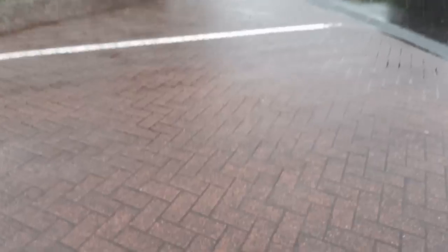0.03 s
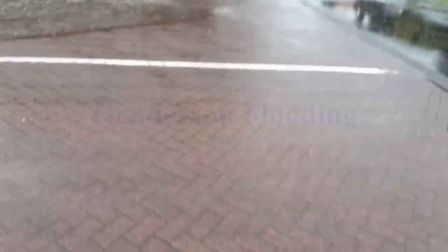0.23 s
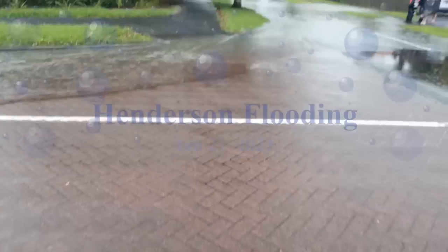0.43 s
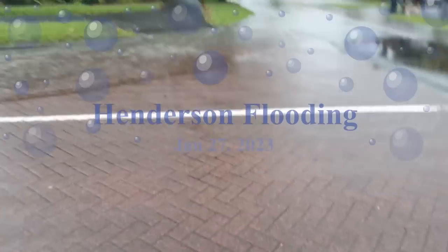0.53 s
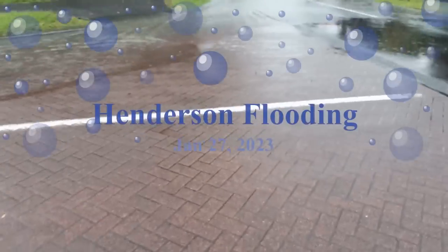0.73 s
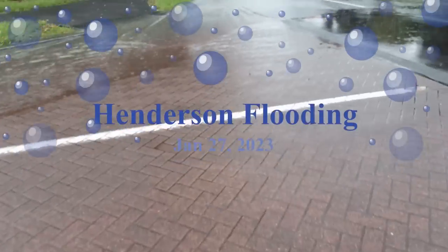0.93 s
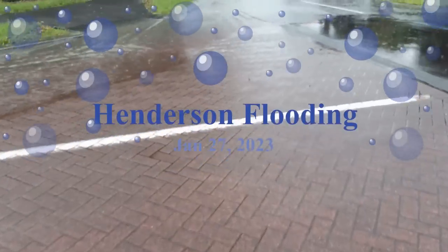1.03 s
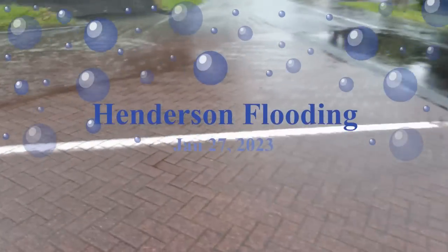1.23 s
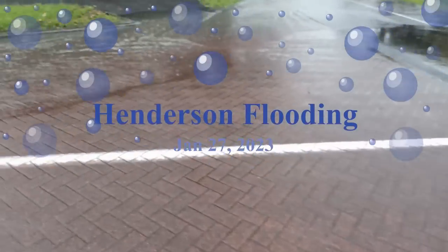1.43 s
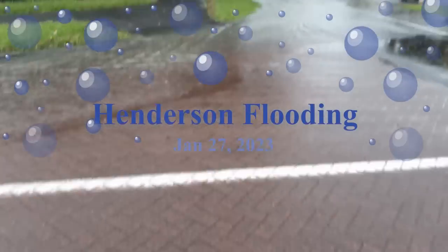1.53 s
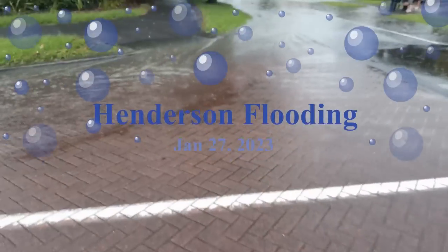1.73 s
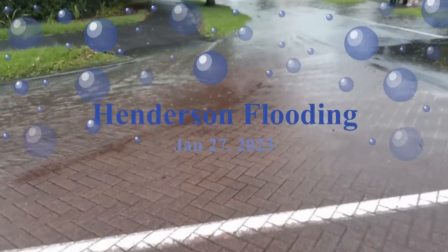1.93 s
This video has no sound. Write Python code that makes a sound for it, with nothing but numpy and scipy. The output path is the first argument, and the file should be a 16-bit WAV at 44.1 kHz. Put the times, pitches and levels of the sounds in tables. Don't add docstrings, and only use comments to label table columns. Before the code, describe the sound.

Constant rain hiss with fine patter and low flowing water, faint distant hum and brief tyre swish; sparse big drops snap close to a small handheld stereo microphone, louder and more ringing on the right.

```python
import sys
import numpy as np
from scipy import signal
from scipy.io import wavfile
from scipy.ndimage import uniform_filter1d

SR = 44100
rng = np.random.default_rng(int(sys.argv[2]) if len(sys.argv) > 2 else 0)


def master_out(mix):
    frames = np.transpose(np.atleast_2d(mix))
    ceiling = np.clip(frames, -1, 1)
    pcm = np.round(ceiling * 32767).astype(np.int16)
    wavfile.write(sys.argv[1], SR, pcm)


def ratio_of_db(decibels):
    return 10 ** (np.asarray(decibels, float) / 20)


N = 88200

# pitch_hz [Hz], level_db [dB per Hz]
HISS = [(400, 5.5), (800, 0), (1450, -11.5), (2000, -3.5), (3500, -13), (7000, -17.5), (8300, -16),
        (16000, -18.5)]
FAR_TOP_HZ, CUTOFF_HZ = 15750, 16750


def rms_one(x):
    return x / np.sqrt(np.mean(x ** 2) + 1e-20)


def line(points, at, warp=lambda v: v):
    a, b = np.transpose(points)
    return np.interp(warp(at), warp(a), b)


def drift(rate):
    r = np.exp(-80 * np.pi * rate / SR)
    steps = rng.standard_normal(N // 40 + 2002)
    slow = signal.lfilter([1], [1, -2 * r, r * r], steps)[2000:]
    return np.interp(np.arange(N) / 40, np.arange(len(slow)), rms_one(slow))


def band(x, low_hz, high_hz):
    edges = [low_hz, min(high_hz, .45 * SR)]
    return signal.sosfilt(signal.butter(2, edges, "band", fs=SR, output="sos"), x)


def top_cut(x, hz):
    return signal.sosfilt(signal.ellip(12, .3, 70, hz, fs=SR, output="sos"), x)


def ring(clicks, hz, t60):
    r, w = ratio_of_db(-60 / (t60 * SR)), 2 * np.pi * hz / SR
    return signal.lfilter([0, np.sin(w)], [1, -2 * r * np.cos(w), r * r], clicks + 1e-18)


def bells(x, rows):
    for hz, width_hz, db in rows:
        g, w = ratio_of_db(db / 2), 2 * np.pi * hz / SR
        q = np.sin(w) * width_hz / hz / 2
        top = [1 + q * g, -2 * np.cos(w), 1 - q * g]
        bottom = [1 + q / g, -2 * np.cos(w), 1 - q / g]
        x = signal.lfilter(top, bottom, x)
    return x


def water_noise(spectrum, edges, slow_db, fast_db):
    # pitch_hz [Hz], share [0-1]
    likeness = [(60, .9), (380, 0.9), (700, 0.49), (1300, 0), (15000, 0.37)]
    out, together, white = 0, drift(7.6), rng.standard_normal((2, 2, N))
    for k, (low, high) in enumerate(zip(edges, edges[1:])):
        mid, side = band(white[k % 2], low, high)
        hz = np.sqrt(low * high)
        alike = np.clip(line(likeness, hz, np.log), 0, 1)
        flicker_db = slow_db * together + fast_db * drift(6.9)
        gain = ratio_of_db(line(spectrum, hz, np.log) + flicker_db)
        out = out + gain * (np.sqrt(1 + alike) * mid + np.sqrt(1 - alike) * side * [[1], [-1]])
    return rms_one(out)


def running_water():
    # time_s [s], level_db [dB]
    flow = [(.11, -40), (.25, -43), (.4, -39), (.5, -41.5), (.66, -40.5), (.77, -38), (.97, -38.5),
            (1.12, -37.5), (1.4, -41), (1.6, -43), (1.8, -40.5), (2.0, -42)]
    # pitch_hz [Hz], level_db [dB per Hz]
    roar = [(36, -32), (50, -10), (68, -6), (100, -2), (230, 1), (330, 0.5), (400, -9), (1100, -17)]
    level_db = line(flow, np.arange(N) / SR) - 1
    edges_hz = 28 * 2 ** np.arange(0, 5.7, 1 / 3)
    return ratio_of_db(level_db) * water_noise(roar, edges_hz, slow_db=-0.23, fast_db=0.73)


def patter():
    drops_per_s, drop_cycles, spread_db = 1500, 3.0, 2.6
    sizes = ratio_of_db(spread_db * np.minimum(rng.exponential(1, N), 3.5)) * rng.choice([-1, 1], N)
    clicks = sizes * (rng.random(N) < drops_per_s / SR) * rng.standard_normal((2, N))
    dealt = rng.integers(0, 16, N)
    out = 0
    for k, hz in enumerate(np.geomspace(1200, 15000, 16)):
        gain = ratio_of_db(line(HISS, hz, np.log)) * hz / 1000
        out = out + gain * ring(clicks * (dealt == k), hz, drop_cycles / hz)
    return rms_one(out)


def rain():
    # time_s [s], level_db [dB]
    shower = [(.11, -45), (.25, -44), (.42, -45.5), (.55, -42), (.7, -45), (.85, -45.5), (.98, -43.5),
              (1.12, -43), (1.3, -45.5), (1.55, -44.5), (1.7, -44), (2.0, -45.5)]
    level_db = line(shower, np.arange(N) / SR) - 3
    far = water_noise(HISS, 400 * 2 ** np.arange(0, 5.8, 1 / 3), slow_db=-0.48, fast_db=1.95)
    return ratio_of_db(level_db) * (far + ratio_of_db(-15) * patter())


def hum():
    # pitch_hz [Hz], level_db [dB]
    tones = [
        (50.5, -51),
        (102.4, -51.5),
        (226, -53.5),
    ]
    width_hz = 6.7
    noise = rng.standard_normal((3, 2 * N))
    noise = noise[0] + 0.83 * noise[1:]
    out = 0
    for hz, db in tones:
        out = out + ratio_of_db(db) * rms_one(ring(noise, hz, 1.7 / width_hz)[:, N:])
    return out


def tyres():
    # time_s [s], level_db [dB]
    passing = [(.11, -52), (.3, -52), (.45, -61), (.7, -57), (.95, -49), (1.15, -55.5), (1.4, -66),
               (2.0, -82)]
    low_hz, high_hz = 903, 1634
    swish = band(band(rng.standard_normal((2, N)), low_hz, high_hz), low_hz, high_hz)
    return ratio_of_db(line(passing, np.arange(N) / SR) + 1.7 * drift(27)) * rms_one(swish)


def spray():
    # centre_s [s], width_s [s], level_db [dB]
    clouds = [
        (1.09, 0.033, -52),
        (0.25, 0.021, -75),
    ]
    t = np.arange(N) / SR
    level = sum(ratio_of_db(db) * np.exp(-.5 * ((t - s) / width) ** 2) for s, width, db in clouds)
    return level * ratio_of_db(3.0 * drift(60)) * rms_one(band(rng.standard_normal((2, N)), 9000, 15000))


def bursts():
    # start_s [s], peak_db [dB], lowest_hz [Hz], highest_hz [Hz], length_ms [ms]
    big_drops = [(.2672, -33, 700, 13800, 1.3), (0.5394, -29, 4800, 16400, 4.9),
                 (.5614, -26, 1670, 16400, 4.9), (0.5663, -23, 1700, 16400, 2.7),
                 (0.596, -28.5, 1900, 3700, 2), (.5988, -32, 2330, 4000, 4.4),
                 (0.68, -29.5, 8900, 16400, 2.2), (0.6871, -48, 4600, 6500, 2.2),
                 (1.0990, -46, 10000, 14000, 4), (1.104, -45, 3530, 7500, 5.1),
                 (1.133, -43, 3500, 9000, 3.3), (1.1438, -41, 8500, 13500, 1.8),
                 (1.1605, -26.5, 4000, 14000, 1.8), (1.1627, -29.5, 3900, 6050, 6.3),
                 (1.1640, -29, 2350, 13500, 3.6), (1.4950, -45, 8000, 14200, 2.2),
                 (1.5780, -44, 3900, 4960, 3.8), (1.5930, -41.5, 2220, 2920, 15),
                 (1.6055, -36, 8000, 14200, 2.2), (1.6280, -32.5, 5000, 14300, 2.6),
                 (1.6120, -42, 2200, 2900, 25), (1.6500, -42.5, 2200, 2900, 22),
                 (1.687, -39, 10500, 14500, 1.8), (1.9079, -37, 3170, 4500, 1.9)]
    # pitch_hz [Hz],
    # width_hz [Hz], boost_db [dB]
    puddle = [(2600, 600, 4), (3300, 500, -3), (4270, 250, 3), (4600, 250, 5), (5350, 350, 5),
              (6300, 900, -3), (8500, 4000, -5), (12500, 4000, -2), (16800, 900, -26)]
    rise, crackle_db, alike, right_db = 0.21, 3, 0.44, -0.5
    out, size, lag = np.zeros((2, N + SR)), 1400, int(.00048 * SR)
    for s, db, low_hz, high_hz, ms in big_drops:
        noise = rng.standard_normal((4, size))
        u = np.arange(size) / SR * 1000 / ms
        shape = np.minimum(u / rise, 1) * np.exp(-2 * u ** 2)
        crackle = ratio_of_db(crackle_db * uniform_filter1d(noise[3], size=16) * 4)
        puff = np.sqrt(alike) * noise[0] + np.sqrt(1 - alike) * noise[1:3]
        puff = puff * crackle * shape
        puff = band(band(puff, low_hz, high_hz), low_hz * .9, high_hz * 1.1)
        limit_hz = CUTOFF_HZ if high_hz > 15300 else FAR_TOP_HZ
        puff = top_cut(bells(puff, puddle), min(1.35 * high_hz, limit_hz))
        puff = ratio_of_db(db) * puff / np.abs(puff).max(axis=1, keepdims=True)
        i = int(s * SR)
        out[0, i:i + size] += puff[0]
        out[1, i + lag:i + lag + size] += ratio_of_db(right_db) * puff[1]
    return out[:, :N]


def pings():
    # start_s [s], peak_db [dB], pitch_hz [Hz], fade_s [s to fall 60 dB]
    bubbles = [
        (.6995, -42, 12450, .035),
        (1.118, -52, 13300, .015),
        (1.070, -53, 11600, .03),
        (1.735, -46, 2050, .08),
    ]
    out = np.zeros(N)
    t = np.arange(N) / SR
    for s, db, hz, t60 in bubbles:
        u = np.maximum(t - s, 0)
        swell = np.minimum(u / .003, 1)
        out += ratio_of_db(db - 60 * u / t60) * swell * np.sin(2 * np.pi * hz * u)
    return out


def scene():
    far = top_cut(rain() + spray(), FAR_TOP_HZ)
    return running_water() + far + hum() + tyres() + bursts() + pings()


def low_pass(x):
    return signal.sosfilt(signal.butter(12, 16820, fs=SR, output="sos"), x)


def record(dry):
    # pitch_hz [Hz], width_hz [Hz], boost_db [dB]
    left_port = [(1900, 200, 8.5), (610, 320, 4), (3530, 3300, 5), (7100, 1400, 4.5), (9000, 4300, -3),
                 (15400, 3300, -15)]
    # pitch_hz [Hz], width_hz [Hz], boost_db [dB]
    right_port = [(811, 94, 9), (1627, 446, 6.5), (2470, 2360, 8), (3130, 430, -4.5), (4500, 3280, 6),
                  (5867, 3140, 12.5), (8260, 2750, -10), (9020, 3900, -5), (12200, 4500, 9),
                  (15900, 3000, -11)]
    start_s, low_cut_hz = .1125, 51
    left = ratio_of_db(-0.5) * bells(dry[0], left_port)
    right = ratio_of_db(4.5) * bells(dry[1], right_port)
    x = np.array([left, right])
    x = signal.sosfilt(signal.butter(4, low_cut_hz, "high", fs=SR, output="sos"), x)
    x = top_cut(x * (np.arange(N) > start_s * SR), CUTOFF_HZ)
    return low_pass(x)


dry = scene()
out = record(dry)
master_out(out)
```